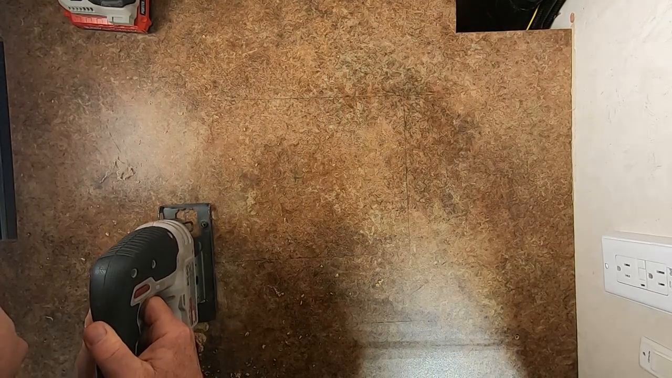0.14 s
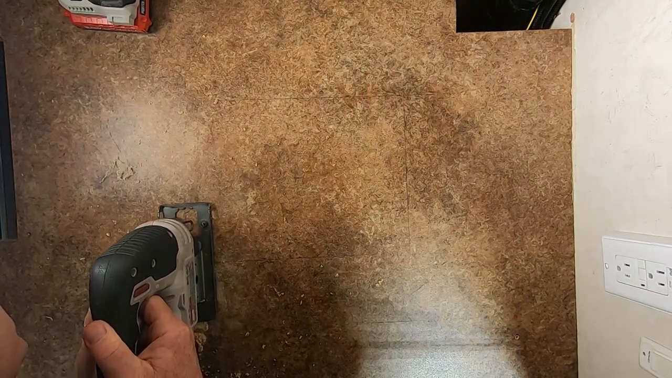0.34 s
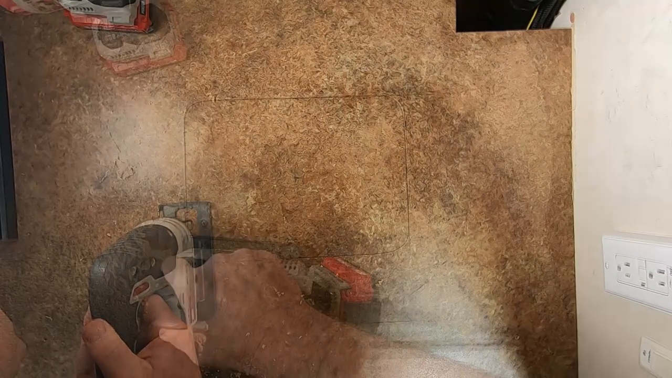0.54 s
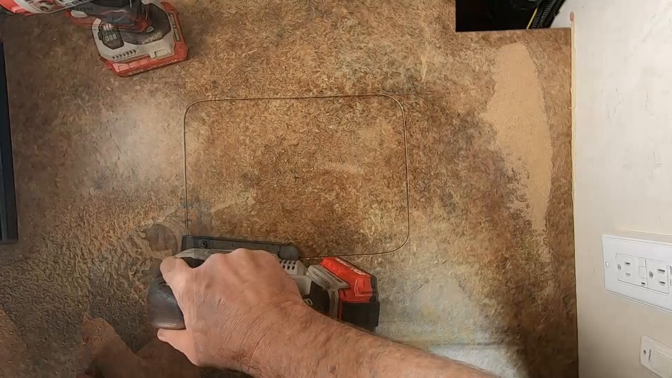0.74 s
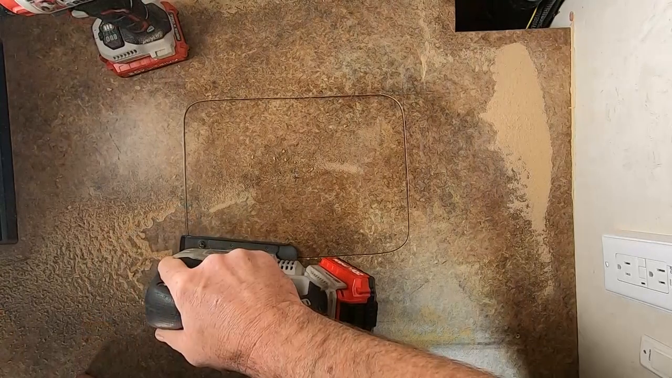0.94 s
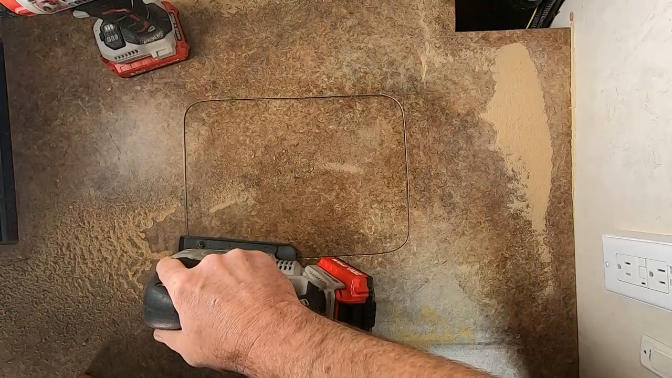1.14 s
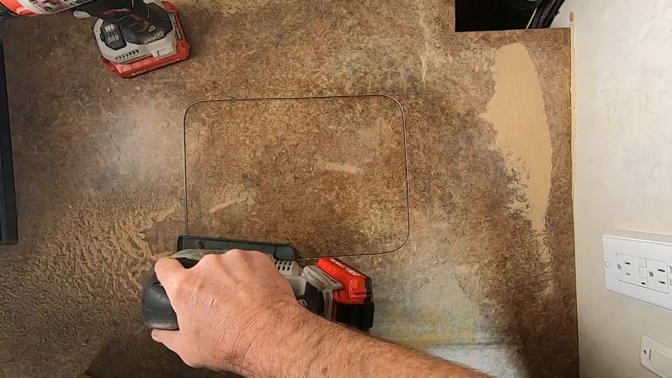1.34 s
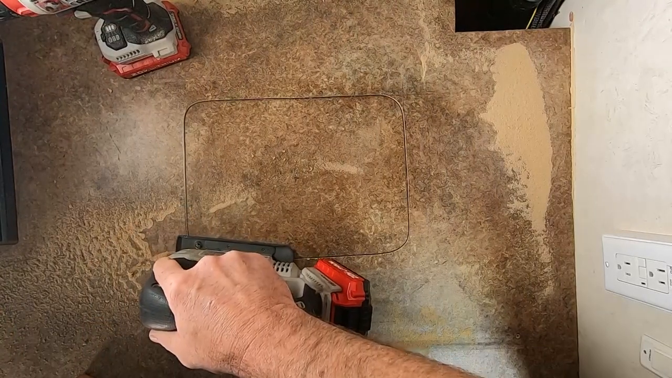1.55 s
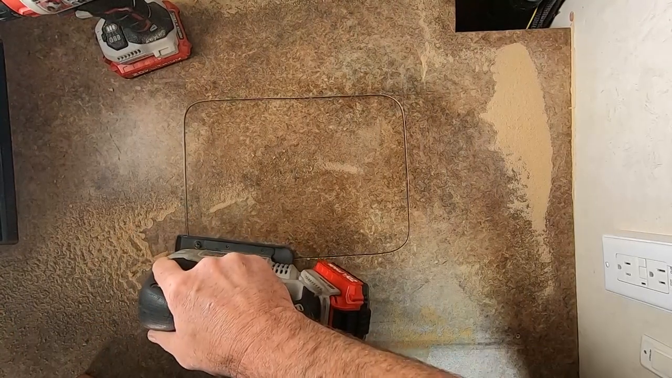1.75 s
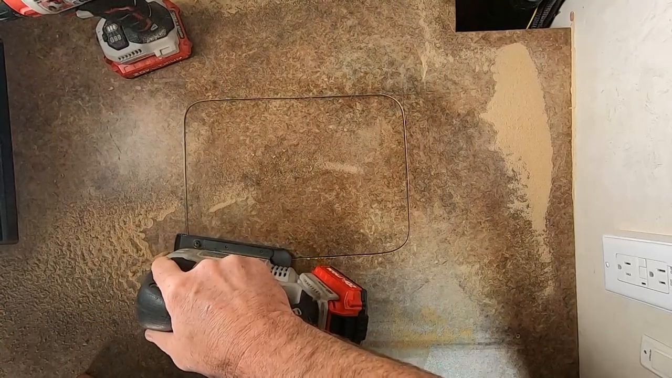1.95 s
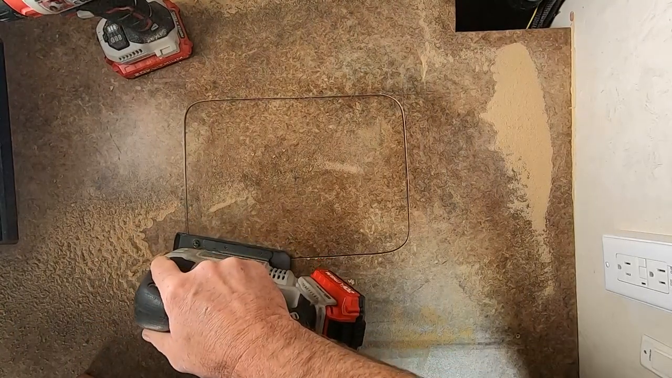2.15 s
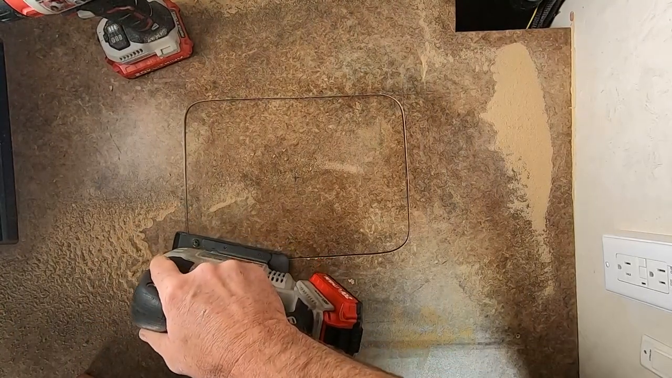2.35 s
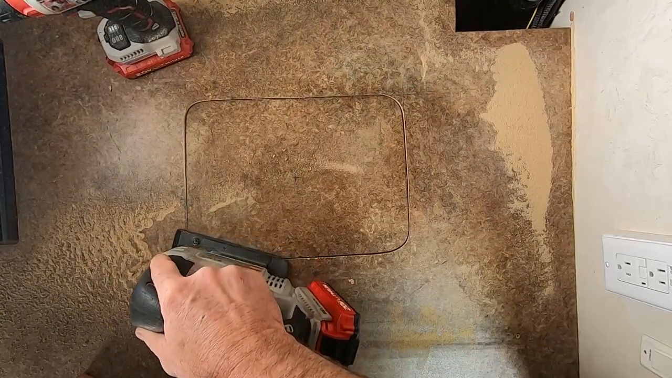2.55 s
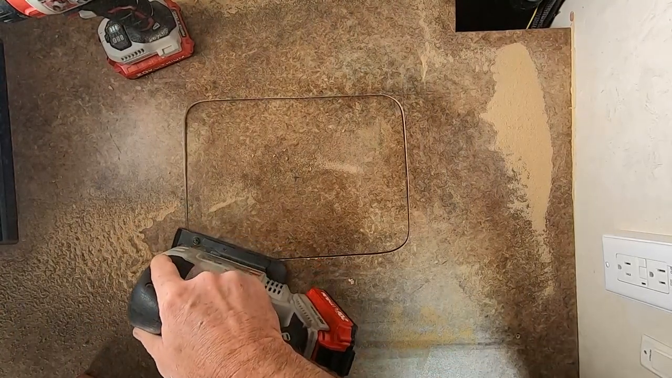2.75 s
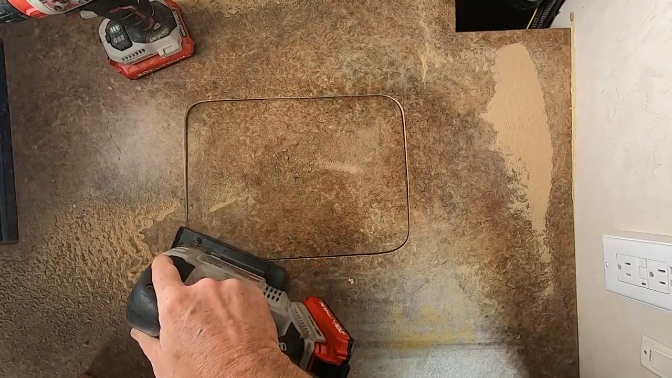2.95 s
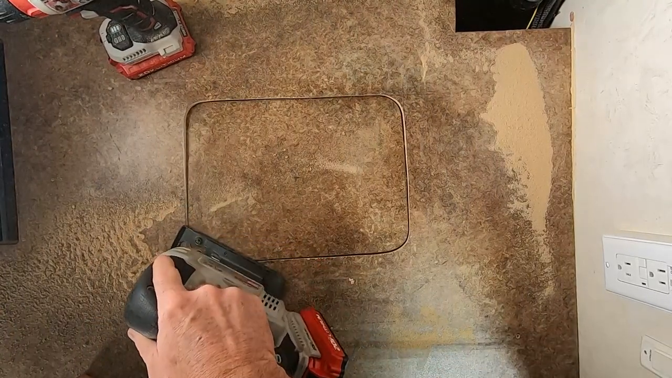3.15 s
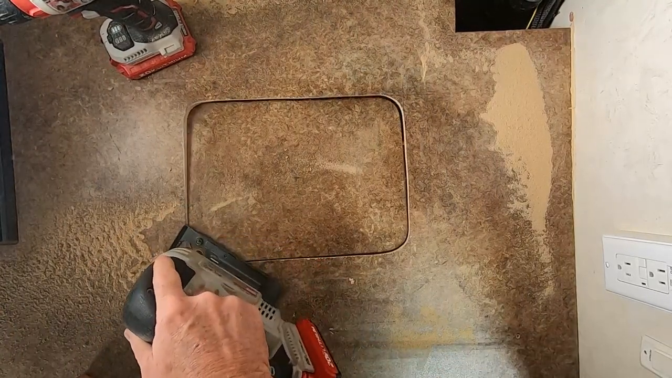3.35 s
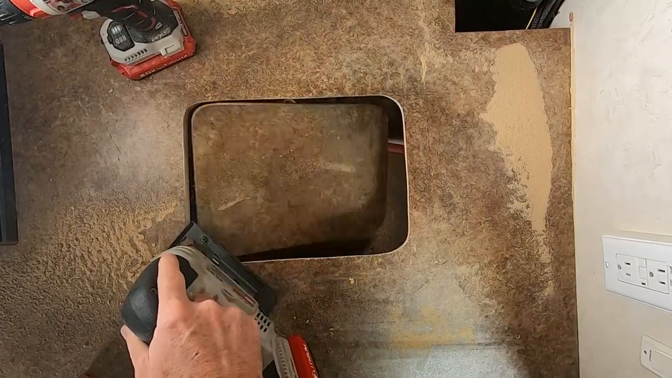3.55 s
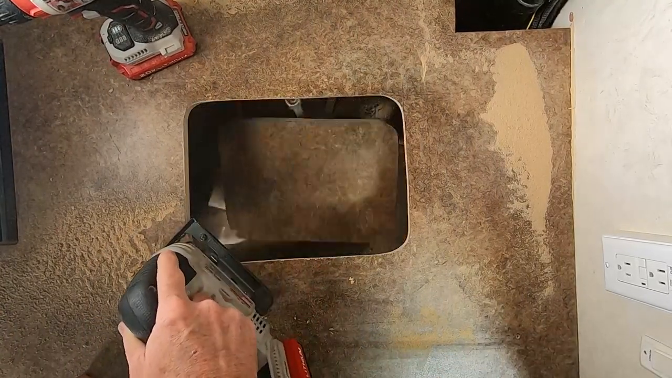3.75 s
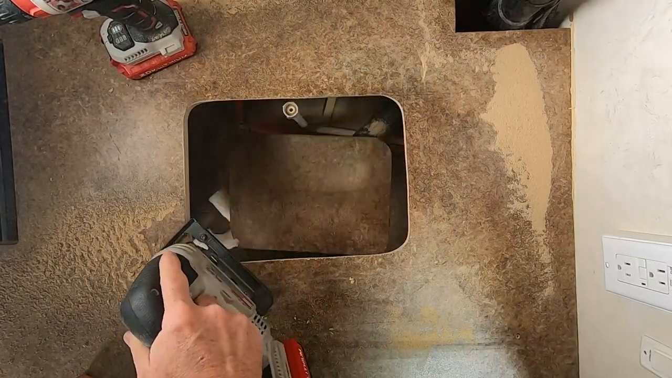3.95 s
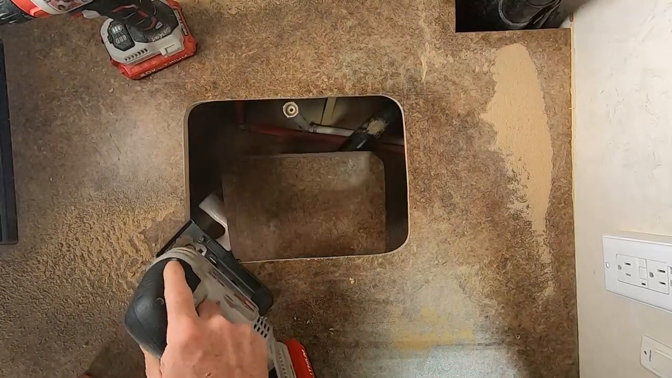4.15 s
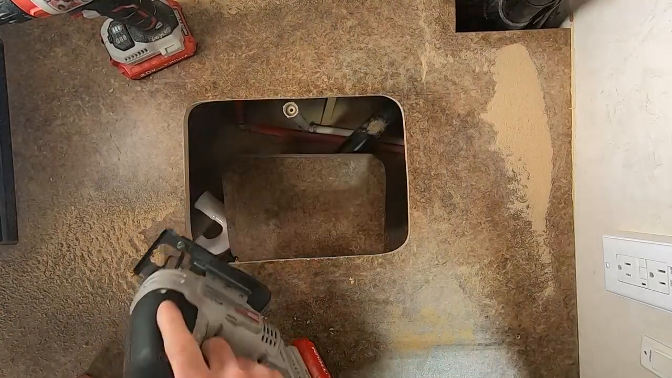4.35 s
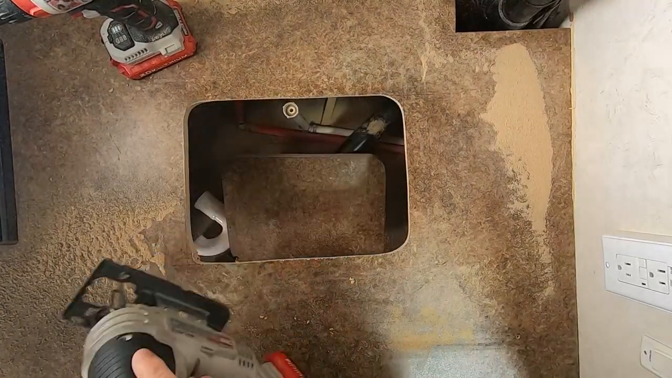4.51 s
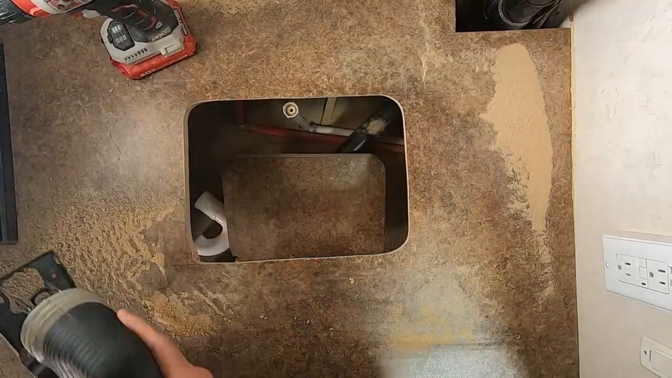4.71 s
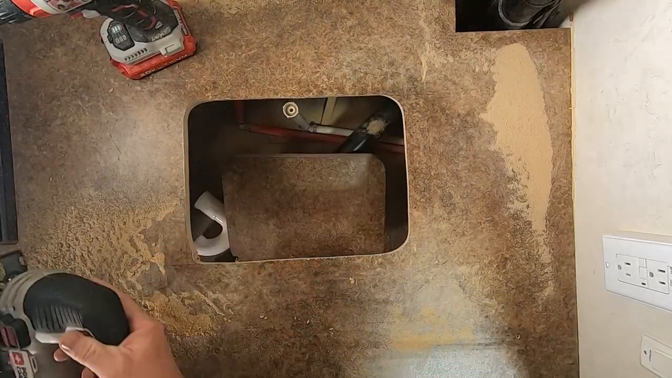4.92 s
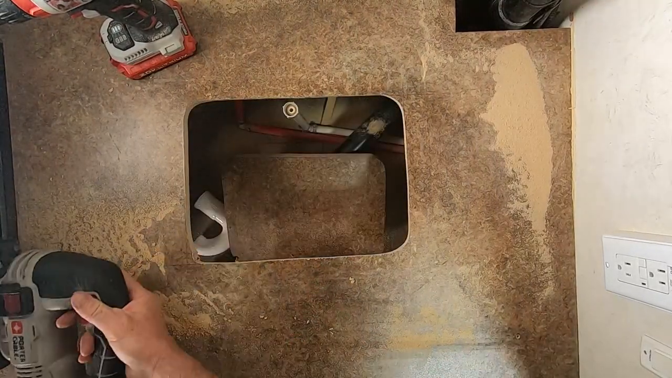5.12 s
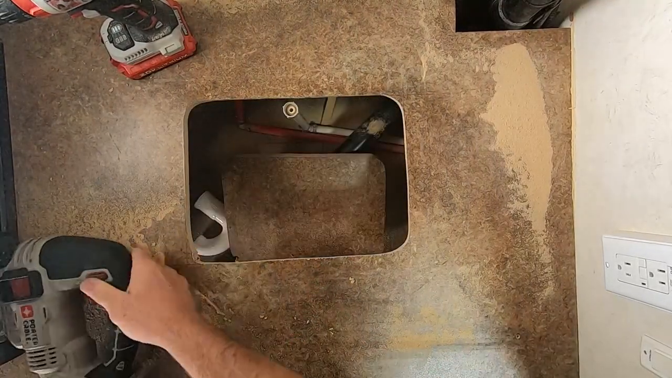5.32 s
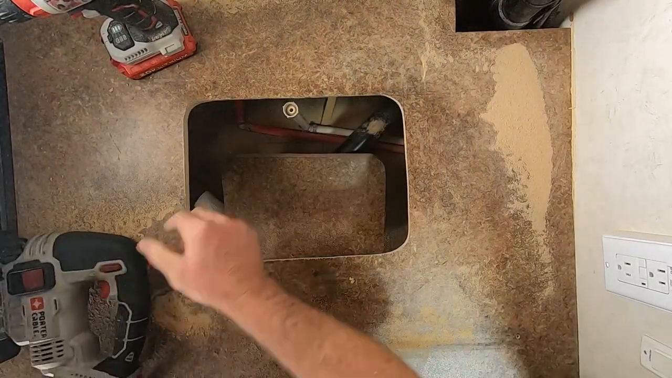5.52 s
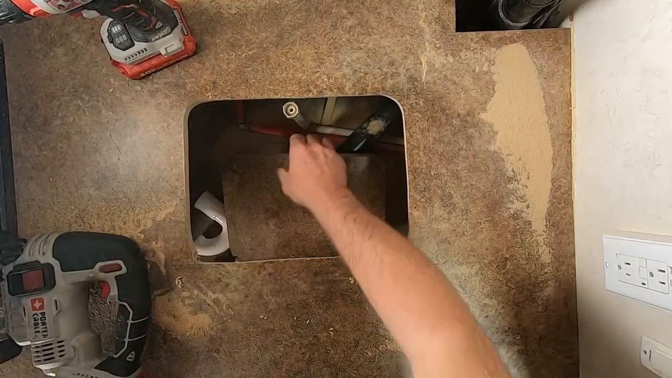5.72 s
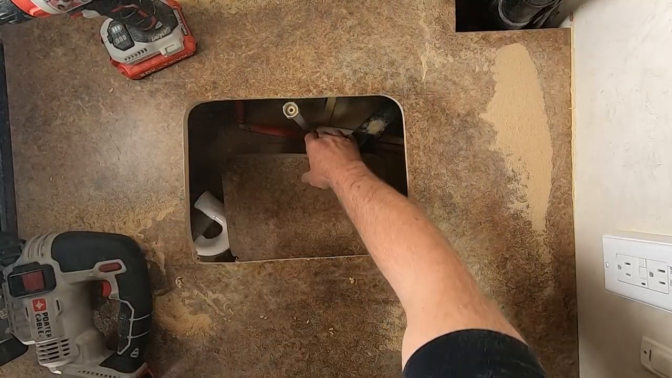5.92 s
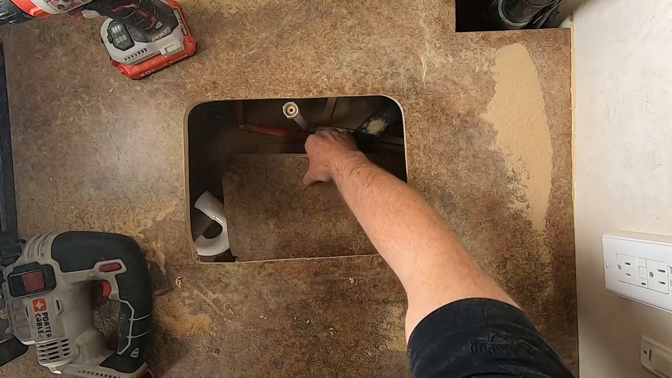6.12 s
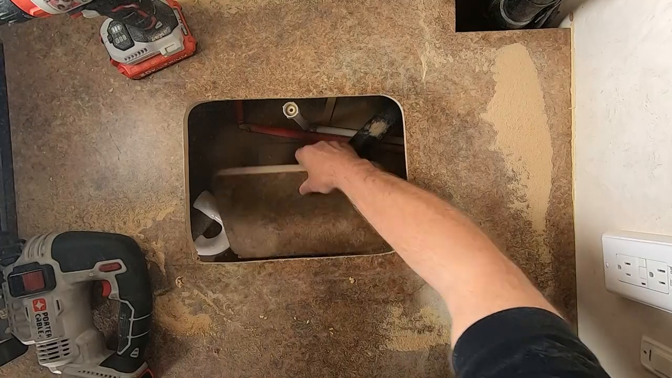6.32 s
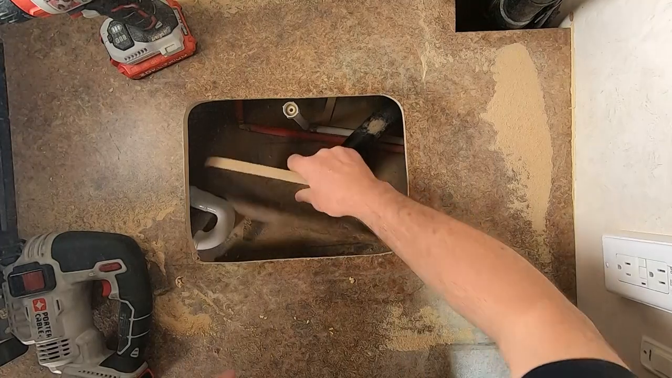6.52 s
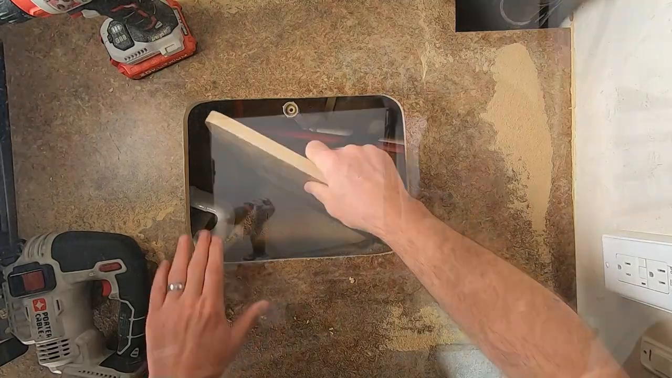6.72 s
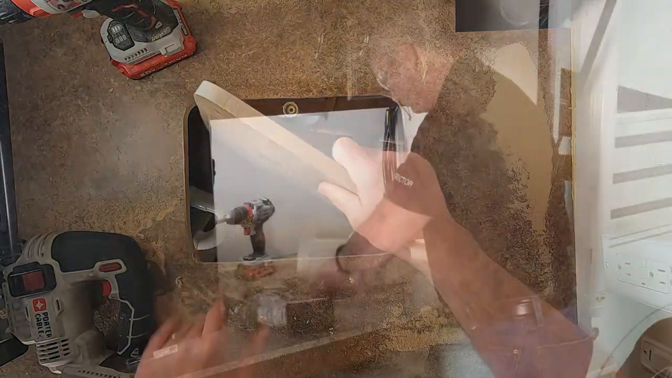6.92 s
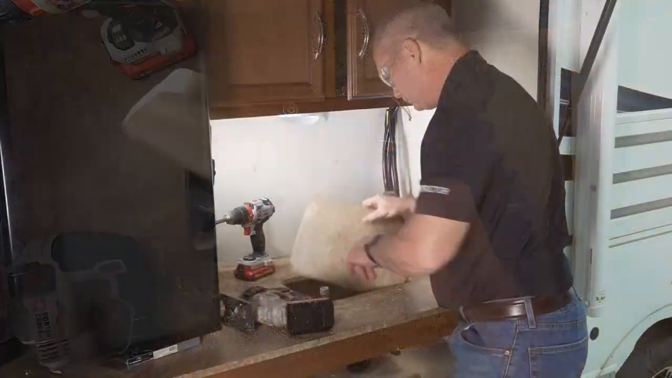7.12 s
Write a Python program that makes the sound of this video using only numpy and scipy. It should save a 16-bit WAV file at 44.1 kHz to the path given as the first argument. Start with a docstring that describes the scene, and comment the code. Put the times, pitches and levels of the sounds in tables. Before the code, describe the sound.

Buzzing, rattling jigsaw cutting board, a jump to a slightly lower pitch, a hard clatter of falling wood, then sparse thumps and scrapes.

```python
"""A cordless jigsaw grinds through a countertop: the end of one cut, then straight into the last one.
The offcut works loose, drops into the cabinet and tumbles; the saw stops, is set down, and the board is
fished out with knocks and scrapes in a small quiet kitchen. Filtered noise pulsing with the stroke makes the
teeth and gears, blows locked to the stroke ring two counter modes, and sines make the shaking and motor tones.
Knocks are noisy contacts ringing wooden modes, scrapes are swelling noise; sparse taps make the reverberation."""
import sys
import numpy as np
from scipy import signal
from scipy.fft import rfft, irfft, next_fast_len
from scipy.io import wavfile
from scipy.ndimage import uniform_filter1d

SR = 44100
rng = np.random.default_rng(int(sys.argv[2]) if len(sys.argv) > 2 else 0)


def store_pcm(level_fs):
    """Save levels as 16-bit WAV."""
    pcm = np.round(np.clip(level_fs, -1, 1) * 32767).astype(np.int16)
    wavfile.write(sys.argv[1], SR, np.atleast_2d(pcm).T)


N = 320607

# Spectrum of a dry crack or tick: (frequency [Hz], density [dB per Hz])
CRACK_SPECTRUM = [(900, -10), (1800, 2), (3500, 0.5), (6000, -6.5), (10000, -15), (15700, -24)]


def gain_of(db):
    """A level in decibels is twenty times the logarithm of an amplitude ratio; this inverts it."""
    return 10 ** (np.asarray(db) / 20)


def evened(x):
    """Normalization by root mean square gives a signal unit effective amplitude."""
    return x / np.sqrt(np.mean(x ** 2) + 1e-20)


def read(points, hz):
    """Interpolation on a logarithmic frequency axis, along which pitch is uniform."""
    f, value = np.transpose(points)
    return np.interp(np.log(hz + 1), np.log(f + 1), value)


def add(mix, s, sound):
    """Superposition: sound pressures sum, here from s seconds on."""
    part = mix[round(s * SR):][:len(sound)]
    part += sound[:len(part)]


def columns(rows):
    """Linear interpolation turns control points into sample times and continuous curves."""
    s, *rest = np.transpose(rows)
    t = np.arange(s[0], s[-1], 1 / SR)
    return t, [np.interp(t, s, column) for column in rest]


def coloured(x, points, lo_hz, hi_hz):
    """Linear filtering multiplies spectra; the result has rms 1 between lo_hz and hi_hz."""
    size = next_fast_len(len(x))
    hz = np.fft.rfftfreq(size, 1 / SR)
    below = hz < points[0][0]
    spectrum = rfft(x, size) * gain_of(read(points, hz) - 40 * below)
    band = irfft(spectrum * (hz > lo_hz) * (hz < hi_hz), size)[:len(x)]
    return irfft(spectrum, size)[:len(x)] / np.sqrt(np.mean(band ** 2) + 1e-20)


def blend(x, slack, held, loose, lo_hz, hi_hz):
    """One excitation through two spectra: a crossfade by looseness."""
    return (1 - slack) * coloured(x, held, lo_hz, hi_hz) + slack * coloured(x, loose, lo_hz, hi_hz)


def drift(count, size):
    """Low-pass random fluctuation of rms 1: noise averaged twice over size samples."""
    smooth = uniform_filter1d(rng.standard_normal(count), size)
    return evened(uniform_filter1d(smooth, size))


def grit(count, spread_db):
    """Modulated noise: a fluctuating level makes some grains larger."""
    return rng.standard_normal(count) * gain_of(spread_db * drift(count, size=30))


def room_tone():
    """Stationary background noise: shaped hiss and rumble with a wavering level."""
    # Background spectrum: (frequency [Hz], density [dB per Hz])
    background_spectrum = [(20, -30), (45, -9), (62, 9), (90, 3.5), (200, -2.5), (500, -4), (900, -5.5),
                           (2770, -17), (6000, -24), (15700, -32)]
    # The background sinks, then creeps up in the quiet: (time [s], level [dB])
    background_level = [(4.5, -54.5), (4.8, -60), (5.5, -57), (6.7, -53)]
    s, db = np.transpose(background_level)
    level_db = np.interp(np.arange(N) / SR, s, db) + 2.0 * drift(N, size=1200)
    return gain_of(level_db) * coloured(rng.standard_normal(N), background_spectrum, 260, 6600)


def kitchen(x):
    """Reverberation: sparse reflections of random sign decay exponentially, each band at its own rate."""
    # Reverberation time of the kitchen: (frequency [Hz], t60 [s])
    reverberation = [(150, 0.33), (800, 0.2), (3000, 0.078), (10000, 0.049)]
    taps = np.zeros(SR // 2)
    at = np.arange(200, len(taps) - 20, 20)
    taps[at + rng.integers(0, 20, len(at))] = rng.choice([-1., 1.], len(at))
    hz, t, bands = signal.stft(taps, SR, nperseg=256)
    decay = gain_of(-60 * t / read(reverberation, hz)[:, None])
    tail = signal.istft(bands * decay, SR, nperseg=256)[1]
    # the reverberation carries little bass
    tail = signal.sosfilt(signal.butter(2, 220, "high", fs=SR, output="sos"), tail)
    return signal.oaconvolve(x, tail / np.linalg.norm(tail))[:N]


def tick(s, db):
    """A heavily damped impulse: a short noise click with hardly any ring."""
    t = np.arange(800) / SR
    return s, gain_of(db - 60 * t / 0.014) * coloured(rng.standard_normal(800), CRACK_SPECTRUM, 2060, 8200)


def rattle():
    """A random point process: independent faint ticks of widely spread size."""
    start_s, end_s, ticks_per_s = 4.6, 7, 20
    t = np.arange(N) / SR
    size = gain_of(4.3 * rng.standard_normal(N)) * (rng.random(N) < ticks_per_s / SR)
    click = tick(0, db=-56.5)[1]
    return signal.oaconvolve(size * (t > start_s) * (t < end_s), click)[:N]


def scrape(s, rise_s, fall_s, db, treble_db):
    """Friction: uneven slips excite a dull body and a gritty treble; a swell, a steady loss, a lift-off."""
    # Spectra of the rubbed body and of its treble: (frequency [Hz], density [dB per Hz])
    body_spectrum = [(120, -5.5), (200, -14), (340, -2.5), (460, -4), (560, -1.5), (660, -4), (830, -2),
                     (1030, -10.5), (1250, -14), (2200, -33), (4000, -65.5)]
    treble_spectrum = [(880, -14), (1500, -10), (1820, -4.5), (2070, -12.5), (3480, -13.5), (5520, -23),
                       (10500, -32.5), (15600, -34)]
    loss_db = 12.5  # steady loss over the fall, before the lift-off
    t = np.arange(0, rise_s + fall_s, 1 / SR)
    gone = np.clip((t - rise_s) / fall_s, 0, 1)
    swell = np.minimum(t / rise_s, 1) ** 2
    lift_off = np.minimum(6 * (1 - gone), 1)
    shape = swell * gain_of(db - loss_db * gone) * lift_off
    slips = grit(len(t), spread_db=0.5)
    body = coloured(slips, body_spectrum, 300, 1400)
    treble = coloured(slips, treble_spectrum, 1600, 8200)
    return s, shape * (body + gain_of(treble_db) * treble)


def ping(s, hz, db, t60):
    """Free vibration: one exponentially decaying mode."""
    t = np.arange(round(t60 * SR)) / SR
    return s, gain_of(db - 60 * t / t60) * np.sin(2 * np.pi * hz * t)


def knock(s, db, boom_db, crack_db, ring, spot_hz):
    """Impact excitation: a blow and its rough after-contact ring wooden modes under a dense crack."""
    # Modes of boards and cabinet, before each knock weights them: (frequency [Hz], level [dB], t60 [s])
    wood_modes = [(166, -21, 0.04), (200.3, 8, 0.087), (318.5, -2, 0.07), (465, -11.5, 0.15),
                  (571, 5, 0.04), (668, 6, 0.036), (780, -2, 0.063), (849, -3.5, 0.049), (1030, 2, 0.053),
                  (1057, -6, 0.018), (1250, -9, 0.055), (1343, -5, .03), (1653, -4.5, 0.035),
                  (1890, -5.5, 0.036), (2070, -16, 0.021), (2330, -6, 0.033), (3080, -8, 0.013)]
    contact_s, rise_s = 0.0056, 0.001  # time constants of the rough contact and of the onset
    t = np.arange(round(.3 * SR)) / SR
    fade = np.exp(-t / contact_s)
    rough = rng.standard_normal(len(t))
    rough = rough - uniform_filter1d(rough, size=60)
    contact = .05 * rough * fade + (t == 0)
    hz, mode_db, t60 = np.transpose(wood_modes)[:, :, None]
    detune = 1 + 0.019 * rng.standard_normal((len(wood_modes), 1))
    # modes near the pitch of the struck spot speak most; the lowest ones have the boom level
    spot_db = np.where(hz < 260, boom_db, -6.5 * abs(np.log2(hz / spot_hz)))
    decay = gain_of(mode_db + spot_db - 60 * t / (t60 * ring))
    modes = decay * np.sin(2 * np.pi * hz * detune * t)
    body = signal.oaconvolve(contact / np.linalg.norm(contact), modes.sum(0))[:len(t)]
    crack = coloured(rng.standard_normal(len(t)), CRACK_SPECTRUM, 2000, 8000)
    crack = crack * (fade + 0.068 * gain_of(-60 * t / 0.2))
    return s, gain_of(db) * (body + gain_of(crack_db) * crack) * (1 - np.exp(-t / rise_s))


def handling():
    """Superposed contact sounds: the offcut tumbles, the saw is set down, the board is fished out."""
    # Knocks: (time [s], blow level [dB], boom against it [dB], crack against it [dB],
    # ring [factor on t60], pitch of the struck spot [Hz])
    knock_rows = [(3.744, -15, -12, -12, 2.03, 999), (3.806, -10, -0.5, -8, 0.91, 1010),
                  (3.853, -6.5, -5, -21, 0.29, 985), (3.945, -17, -13, -6, 0.57, 1500),
                  (4.009, 1, -37, -35.5, 0.32, 590), (4.026, -8, -13, -20, 1.15, 750),
                  (4.07, -15.5, -17, -36, 4.3, 650), (4.079, -25, -17, -30, 1.2, 1000),
                  (4.091, -9.5, -32, -30, 1, 636), (4.104, -7.5, -28, -35, 0.39, 650),
                  (4.191, -17, -20, -31, 0.91, 1000), (4.197, -12.5, -3.5, -41, 1.02, 1010),
                  (4.233, -15.5, -36, -32, 3.2, 800), (4.293, -11, -26.5, -29, 0.96, 875),
                  (4.342, -20.5, -30, -41, 1.05, 668), (4.767, -48, -11, -0.5, 0.87, 751),
                  (4.903, -43.5, -2, -7, 0.44, 420), (5.199, -12, -25, -22.5, 0.34, 553),
                  (5.221, -30.5, -19, 6.5, 0.77, 619), (5.251, -26, -14, 3, 0.44, 498),
                  (5.304, -25.5, -30, -27, 0.98, 450), (5.325, -27, -25, -1.5, 0.39, 466),
                  (5.43, -44, -20, -4.5, 1, 900), (5.618, -30, 1.5, -13, 0.36, 470),
                  (5.674, -19, -20, -35, 0.64, 580), (5.977, -5, -43, -9.5, 0.34, 764),
                  (5.99, -8.5, -17, -22, 0.27, 430), (6.413, -30, -7, -7, 1.97, 463),
                  (6.5, -7, -4.5, -23, 0.71, 830), (6.58, -27, -18, -24, 1.2, 950),
                  (6.921, -39, -12, -19, 1.1, 528), (6.97, -34.5, -12, -4.5, 0.89, 1030),
                  (7.245, -24.5, -6, -22, 1, 353)]
    # A metal fitting rings on after a sharp knock: (time [s], frequency [Hz], level [dB], t60 [s])
    fitting = (5.985, 1852, -34, .19)
    # Small dry ticks of the saw in the hand: (time [s], level [dB])
    tick_rows = [(4.793, -52), (4.8133, -55), (4.9899, -55.5), (5.004, -52.5), (5.0208, -49), (5.028, -50),
                 (5.1016, -52), (5.11, -60)]
    # Rubbing and rattling: (start [s], rise [s], fall [s], body level [dB], treble against it [dB])
    scrape_rows = [(3.99, 0.01245, 0.14, -16, -16.5), (4.12, 0.012, 0.06, -32, -17),
                   (4.225, 0.019, 0.14, -22.5, -22), (4.36, 0.038, 0.06, -35.5, -4.5),
                   (5.186, 0.0049, 0.0125, -52, 1), (5.2, 0.025, 0.061, -26.5, -5),
                   (5.3, 0.03, 0.038, -33.5, -10), (5.615, 0.017, 0.033, -30.5, -5),
                   (5.67, 0.0068, 0.036, -31.5, -10.5), (6.36, 0.028, 0.033, -49, -4),
                   (6.4, 0.038, 0.027, -30, -10.5), (6.575, 0.018, 0.019, -28.5, -10.5),
                   (6.91, 0.013, 0.069, -42, -6), (6.96, 0.04, 0.038, -51, 11.5),
                   (7.24, 0.0056, 0.024, -27.5, -4)]
    hands = rattle()
    for source, rows in ((knock, knock_rows), (ping, [fitting]), (tick, tick_rows), (scrape, scrape_rows)):
        for row in rows:
            add(hands, *source(*row))
    return hands


def tone(s0, s1, hz, db):
    """A quasi-periodic line: one motor sine with slight frequency and amplitude modulation."""
    n = round((s1 - s0) * SR)
    turns = np.cumsum(hz * (1 + .0018 * drift(n, size=1500))) / SR
    level = gain_of(db + 1.8 * drift(n, size=2500))
    return s0, level * np.sin(2 * np.pi * turns) * signal.windows.tukey(n, .12)


def shake(t, strokes, motor):
    """Forced vibration: wavering harmonics of the stroke and sidebands of the shaft rate."""
    # Shaking of the counter:
    # (stroke multiple, first cut [dB], offcut held [dB], sagging [dB], hanging [dB])
    stroke_lines = [(3, -45, -38, -37, -33), (4, -39, -47, -49, -41), (5, -53, -37, -30, -27.5),
                    (6, -54, -37, -47, -47), (7, -47, -48, -42, -34), (8, -35, -48, -44, -47),
                    (9, -40, -37, -35, -30), (10, -50, -36, -26, -25), (11, -42, -42, -38, -27),
                    (12, -39, -42, -45, -46), (13, -38, -38, -38, -28), (14, -40, -47, -44, -33)]
    # Motor hum and its side lines, in stroke multiples above the shaft rate:
    # (stroke multiple, first cut [dB], offcut held [dB], sagging [dB], hanging [dB])
    shaft_lines = [(-1, -33, -44, -46, -50), (0, -30, -34, -32, -44), (1, -42, -36, -36, -46),
                   (3, -42, -38, -34, -46)]
    # Which level column applies: (time [s], column index [from 0, fractions blend])
    stages = [(.664, 0), (.665, 1), (2.4, 1.15), (2.65, 2), (2.95, 2.15), (3.2, 3)]
    let_go_s, let_go_db_per_s = 3.67, 550  # the offcut drops and the shaking dies
    stage = np.interp(t, *np.transpose(stages))
    lines = np.zeros(len(t))
    for base, rows in ((0, stroke_lines), (motor, shaft_lines)):
        for k, *db in rows:
            level_db = np.interp(stage, range(len(db)), db) + 0.49 * drift(len(t), size=2500)
            lines += gain_of(level_db) * np.sin(2 * np.pi * (k * strokes + base) + k * k)
    return lines * gain_of(-let_go_db_per_s * np.maximum(t - let_go_s, 0))


def panel(strokes, motor, slack, rough=.1):
    """Modal resonance: two uneven blows a stroke ring a close pair of modes, which beat into a soft burst."""
    # Counter modes under the shoe, offcut held: (frequency [Hz], bandwidth [Hz], level [dB])
    held_modes = [(866, 48, 0), (950, 50, 1)]
    # The pair draws lower once the offcut hangs: (frequency [Hz], bandwidth [Hz], level [dB])
    loose_modes = [(858, 42, 0), (920, 44, 0)]
    # Blows where the blade turns round:
    # (share of the stroke, level held [dB], level loose [dB], direction [+1 or -1])
    blow_rows = [(0, 0, 1.5, 1), (.5, -4, -11, -1)]
    mirror_held_db, mirror_loose_db = -4, -13  # part of each blow that slips against the shaft the other way
    n = len(strokes)
    blows = np.zeros(n, complex)
    freed = np.clip((slack - .06) / .04, 0, 1)  # the balance of the blows shifts as the offcut stirs
    mirror = gain_of(mirror_held_db + (mirror_loose_db - mirror_held_db) * freed)
    for share, db, loose_db, way in blow_rows:
        at = np.flatnonzero(np.diff(np.floor(strokes - share)))
        late, size_db = rng.standard_normal((len(at), 2)).T
        level = gain_of(db + (loose_db - db) * freed[at] + size_db)
        # each blow takes the phase at which it catches the shaft
        blows[at] = way * level * np.exp(1j * (2 * np.pi * motor[at] + .2 * late))
    blows = blows / np.sqrt(np.mean(abs(blows) ** 2))
    chatter = rough * rng.standard_normal(n)
    # lower and upper mode, driven in opposite phase
    drives = blows + chatter, mirror * blows.conj() - blows - chatter
    t = np.arange(3000) / SR

    def ringing(modes):
        """Convolution of each drive with the impulse response of its mode."""
        total = np.zeros(n)
        for drive, (hz, width_hz, db) in zip(drives, modes):
            response = gain_of(db) * np.exp(np.pi * (2j * hz - width_hz) * t)
            total += signal.oaconvolve(drive, response)[:n].imag
        return evened(total)

    return (1 - freed) * ringing(held_modes) + freed * ringing(loose_modes)


def cut(rows, speed, shaft, grinds, whines, start):
    """Periodic amplitude modulation: tearing and whine pulse with the stroke; the counter rings and shakes."""
    # The offcut works loose: (time [s], looseness [share 0-1])
    looseness = [(.665, 0), (2.3, .1), (2.6, .75), (3.5, .95)]
    t, (grind_db, ring_db, whine_db) = columns(rows)
    strokes = start + np.cumsum(np.interp(t, *np.transpose(speed))) / SR
    motor = np.cumsum(np.interp(t, *np.transpose(shaft))) / SR
    slack = np.interp(t, *np.transpose(looseness))
    turn = 2 * np.pi * strokes
    bite = gain_of(1.8 * np.cos(turn - .6) + 1.1 * np.cos(2 * turn - 1.2))  # the upstroke cuts harder
    # the same teeth bite alike every stroke; only the fast part of the pattern is kept
    teeth = irfft(rfft(rng.standard_normal(1300)) * (np.arange(651) > 23))
    teeth = teeth[(strokes % 1 * 1300).astype(int)]
    wobble = np.sqrt(2) * np.cos(2 * np.pi * motor)  # the shaft wobbles a firm bite
    teeth = teeth * (slack + (1 - slack) * wobble)
    tearing = (grit(len(t), spread_db=2.0) + 0.62 * teeth) * bite
    grind = blend(tearing, slack, *grinds, 1070, 4200)
    mesh = gain_of(1.4 * np.cos(turn - 2.5) + 1.5 * np.cos(2 * turn - .3) + 1.0 * np.cos(4 * turn))
    whine = blend(grit(len(t), spread_db=2.5) * mesh, slack ** 3, *whines, 9200, 13900)
    sound = gain_of(grind_db) * grind + gain_of(whine_db) * whine
    sound += gain_of(ring_db) * panel(strokes, motor, slack) + shake(t, strokes, motor)
    return t[0], sound * signal.windows.tukey(len(t), 0.0013 / (t[-1] - t[0]))


def jigsaw():
    """Superposition of broadband cutting noise and narrow motor lines over two successive cuts."""
    # One list a cut: (time [s], grind level [dB], panel ring level [dB], whine level [dB])
    cut_levels = [
        [(0.0, -15.5, -29.5, -27.5), (0.665, -16, -22.5, -29)],
        [(0.665, -16.5, -18, -31), (1.4, -17.5, -16, -33), (2.25, -19.5, -14, -34), (2.6, -17.5, -18.5, -32),
         (3.0, -18, -17.5, -32), (3.25, -17, -26, -29), (3.56, -16, -44, -32), (3.8, -19, -29, -39),
         (3.95, -17.5, -34.5, -35.5), (4.0, -28.5, -28.5, -50)],
    ]
    # Blade speed in each cut; in the last it climbs, then sags at the end: (time [s], rate [strokes per s])
    blade_speeds = [
        [(0, 36.7), (.665, 37.6)],
        [(.665, 32.6), (1.7, 32.7), (2.3, 33.4), (3.17, 33.95), (3.7, 31.3)],
    ]
    # A faster rotation, probably the motor shaft, in each cut: (time [s], rate [turns per s])
    shaft_speeds = [
        [(0, 353), (.665, 356)],
        [(.665, 315.5), (1.7, 315), (2.2, 320.5), (2.85, 320.5), (3.05, 330), (3.2, 331), (3.7, 308)],
    ]
    # Teeth tearing wood, in the first cut, with the offcut held and loose:
    # (frequency [Hz], density [dB per Hz])
    grind_first = [(60, -45.5), (240, -28), (330, -10.5), (420, -15), (830, -2.5), (1100, -2.5),
                   (1520, -8.5), (1850, -2), (2230, -12), (2450, -8), (2750, -12), (4000, -18),
                   (7500, -28.5), (12000, -36)]
    grind_held = [(60, -47), (250, -16.5), (320, -10), (420, -10.5), (700, -1), (900, -1.5), (1150, -1.5),
                  (1300, -7.5), (1720, -2), (1880, -3), (2040, -2.5), (2330, -8.5), (2600, -8),
                  (4000, -17.5), (7500, -30), (12000, -55)]
    grind_loose = [(60, -38.5), (250, -20), (340, -7), (450, -10.5), (600, -5.5), (950, -0.5), (1300, -8),
                   (1600, -1.5), (2000, -8.5), (2470, -7), (4300, -19.5), (7500, -28), (12000, -57)]
    # Gears, fan and brushes, in the same three states: (frequency [Hz], density [dB per Hz])
    whine_first = [(3530, -16), (6000, -4.5), (7210, -7.5), (9540, -1.5), (10300, 2.5), (12600, -9.5),
                   (14000, -8.5), (15600, -19)]
    whine_held = [(3530, -15), (6000, -13.5), (7100, -14), (10500, -4.5), (12200, -9), (13600, -7),
                  (15600, -18)]
    whine_loose = [(2940, -22), (5000, 2), (5850, -2), (6200, 9), (6550, -9.5), (7940, -2.5), (10900, 4.5),
                   (13700, 2), (15600, -4)]
    # Thin motor tones: (start [s], end [s], frequency [Hz], level [dB])
    motor_tones = [(0, .67, 1790, -28), (0, .67, 1826, -29), (0, .67, 1949, -28), (.665, 1.5, 1750, -30),
                   (1.05, 1.5, 1815, -29), (.7, 1.95, 1990, -32), (.7, 1.75, 2055, -31),
                   (2.05, 2.65, 1776, -28), (2.3, 3.2, 1676, -27), (2.25, 3.15, 1910, -31),
                   (2.3, 3.0, 10500, -42)]
    saw = np.zeros(N)
    # start is the share of a stroke already gone when the cut is first heard
    add(saw, *cut(cut_levels[0], blade_speeds[0], shaft_speeds[0],
                  [grind_first] * 2, [whine_first] * 2, start=.3))
    add(saw, *cut(cut_levels[1], blade_speeds[1], shaft_speeds[1],
                  (grind_held, grind_loose), (whine_held, whine_loose), start=.32))
    for row in motor_tones:
        add(saw, *tone(*row))
    return saw


def scene():
    """Direct and reverberant sound of saw and handling add to the background."""
    direct = jigsaw() + handling()
    near = direct + gain_of(-15.5) * kitchen(direct)
    # small things radiate no deep bass
    near = signal.sosfilt(signal.butter(4, 75, "high", fs=SR, output="sos"), near)
    return (near + room_tone())[None]


def record(dry):
    """Saturation rounds off loud peaks; a linear-phase low-pass then limits the band."""
    limit, edge_hz = .77, 15760
    soft = limit * np.tanh(dry / limit)
    low_pass = signal.firwin(2047, edge_hz, window=("kaiser", 9), fs=SR)
    return signal.oaconvolve(soft, low_pass[None], "same")


dry = scene()
out = record(dry)
store_pcm(out)
```